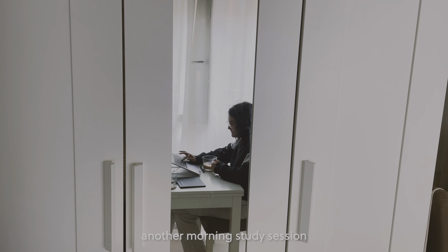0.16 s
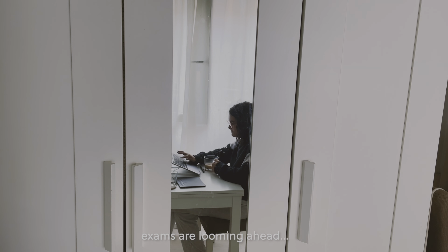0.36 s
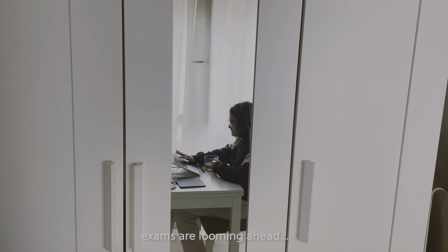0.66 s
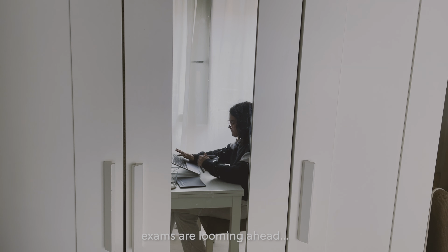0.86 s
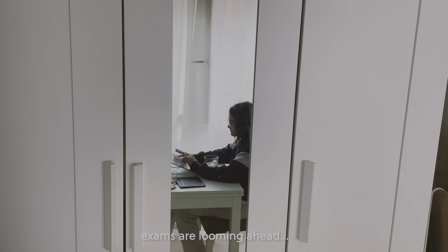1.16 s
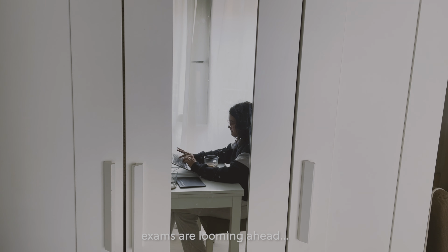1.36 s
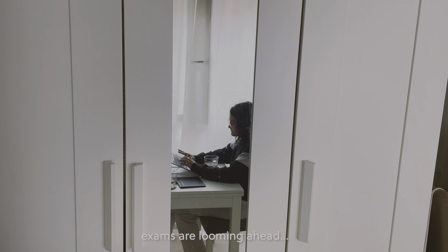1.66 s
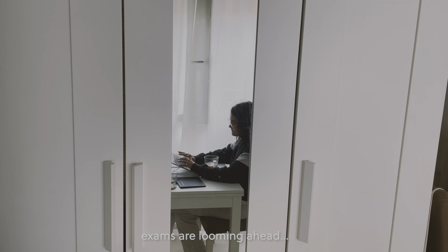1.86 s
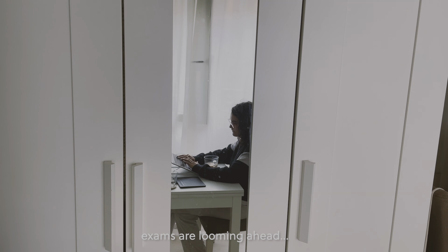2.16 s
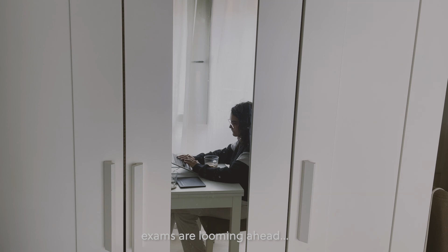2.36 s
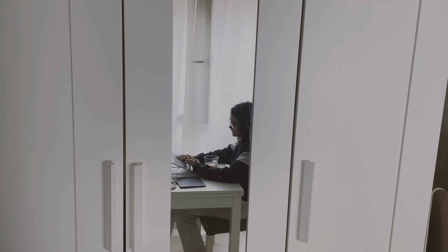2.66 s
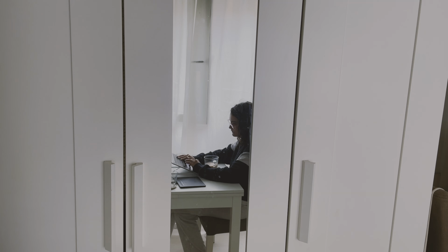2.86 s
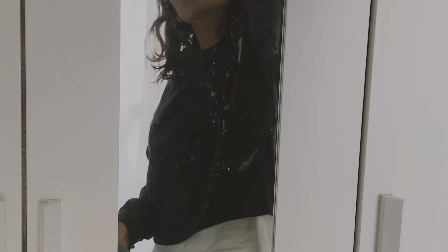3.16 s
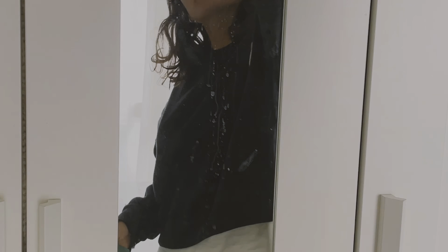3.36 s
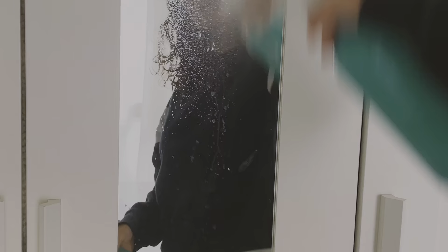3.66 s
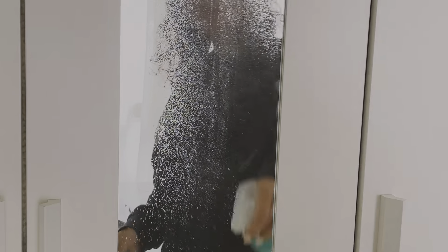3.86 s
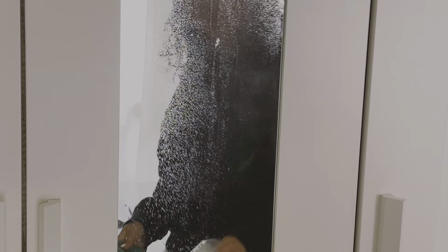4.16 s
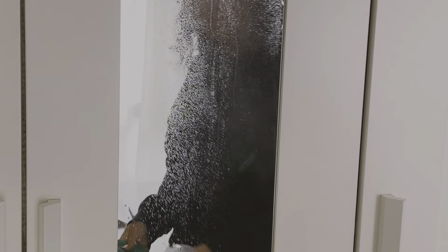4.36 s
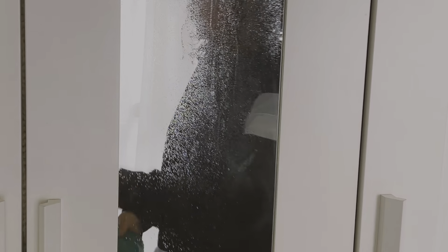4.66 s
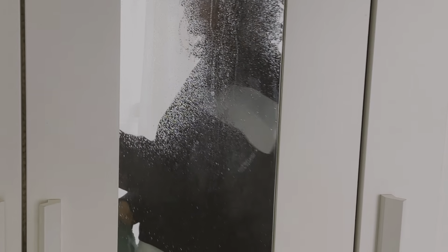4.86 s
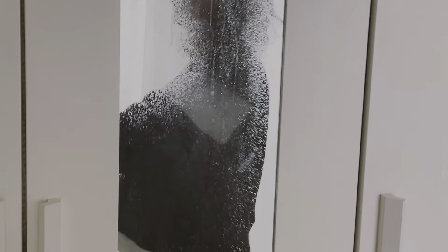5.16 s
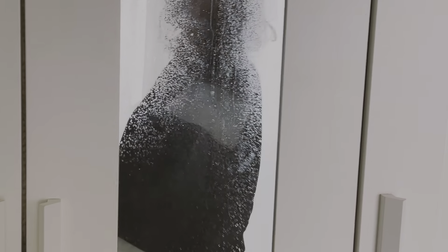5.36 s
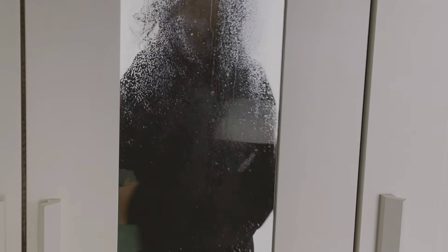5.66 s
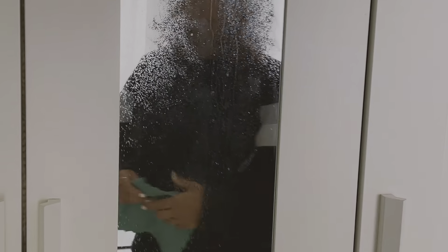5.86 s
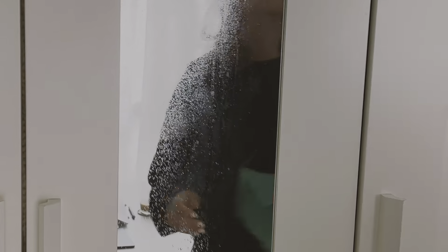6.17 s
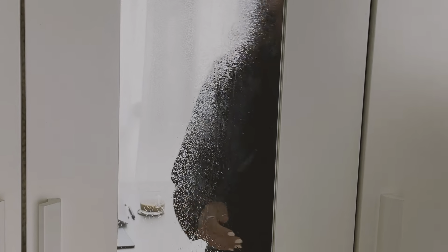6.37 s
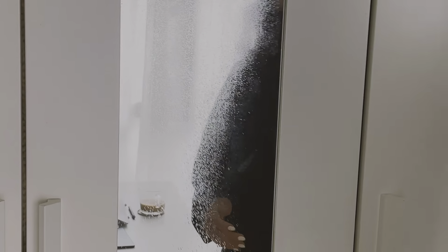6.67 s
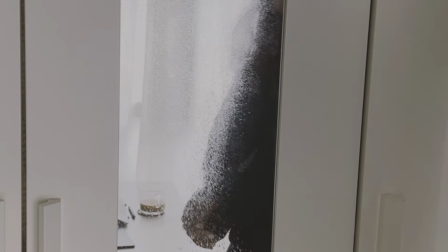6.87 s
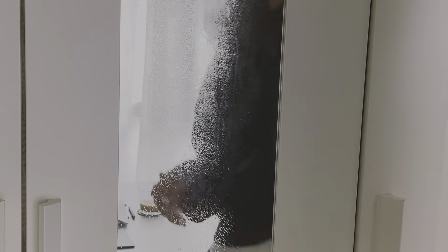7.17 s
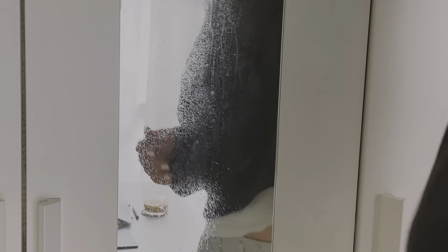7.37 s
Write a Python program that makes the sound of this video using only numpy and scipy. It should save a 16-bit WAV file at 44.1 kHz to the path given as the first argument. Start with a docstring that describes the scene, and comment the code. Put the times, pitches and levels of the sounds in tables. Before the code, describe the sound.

Quiet domestic room, close stereo pickup. Faint plumbing murmurs behind low rumble after an initial dull thump. The water cuts off, a spray bottle gives quick fine spattering squirts with tiny squeaks, and its plastic parts click sharply. Around the middle a single loud wooden knock shakes the wardrobe door; lighter taps and soft fabric wiping continue to the end, with a few low bumps.

```python
"""A thump of a door opens the scene, over a faint pipe whistle and house rumble in a bedroom with mirrored doors.
Water runs next door, as noise through pipe resonances; then a trigger bottle sprays the mirror, as spattering noise.
Its plastic parts and the door edge tick, as damped tones and noise bursts. The door is knocked hard: decaying modes
ring and loose fittings shudder. Sleeves and a cloth rustle in swells of noise. The microphone ports turn the
treble's phase."""
import sys
import numpy as np
from scipy import signal
from scipy.fft import rfft, irfft, next_fast_len
from scipy.io import wavfile
from scipy.ndimage import uniform_filter1d, map_coordinates

SR = 44100
rng = np.random.default_rng(int(sys.argv[2]) if len(sys.argv) > 2 else 0)


def level_to_linear(level):
    """Convert decibel levels to linear amplitude factors, elementwise."""
    exponent = np.asarray(level, float) / 20
    return 10 ** exponent


def waveform_to_disk(signal):
    """Save audio, clipped to [-1, 1], as 16-bit WAV at the path in sys.argv[1]."""
    frames = np.transpose(np.atleast_2d(signal))
    scaled = np.clip(frames, -1, 1) * 32767
    samples = np.round(scaled).astype(np.int16)
    wavfile.write(sys.argv[1], SR, samples)


N = 332028  # length [samples]

# Blows on the door: (time [s], relative panel level [dB], favoured panel pitch [Hz],
# relative edge level [dB], favoured edge pitch [Hz])
DOOR_BLOWS = [(.001, -21.5, 106, -37.5, 613), (2.812, -37.5, 119, -46, 586), (3.217, -33.5, 166, -50, 452),
              (5.023, -24, 204, -23.5, 810), (5.029, -25.5, 252, -9.5, 738),
              (5.0394, -5.5, 147.6, -31.5, 415), (5.055, -21, 290, -45, 480), (5.19, -48.5, 200, -34, 685),
              (5.204, -15.5, 122.6, -33.5, 505), (5.454, -35.5, 60, -41.5, 560),
              (5.562, -40, 61, -41.5, 600), (5.637, -35, 251, -46, 1060), (5.771, -36.5, 198, -40, 617),
              (5.8, -29, 106, -51, 460), (5.932, -39, 101, -38.5, 580), (5.974, -34, 201.2, -39.5, 640),
              (6.029, -39.5, 183, -41.5, 647), (6.048, -43, 200, -40.5, 640), (6.083, -34.5, 200, -39, 540),
              (6.129, -35, 230, -41.5, 480), (6.19, -50, 198, -47, 630), (7.245, -26.5, 75, -68, 450),
              (7.448, -33, 71, -74.5, 460)]
# Modes of the wide panel and of its stiff edge: (frequency [Hz], relative level [dB], decay by 60 dB [s])
PANEL_MODES = [(57.43, -1, 0.94), (78.2, 1.5, 0.31), (106, 1, 0.31), (137.9, 5, 0.059), (184.6, 6, 0.076),
               (236, 5.5, 0.032), (254.3, 1, 0.188), (287.5, 1.5, 0.174)]
EDGE_MODES = [(398, 2.5, 0.13), (480, -10, 0.16), (548, 0, 0.055), (646, 3.5, 0.053), (803, 9.5, 0.021),
              (924.4, 5, 0.022), (1040, 2, 0.039), (1087, 9, 0.015), (1445, 12.5, 0.017)]
# Mirror tones: (frequency [Hz], relative level [dB])
MIRROR_TONES = [(4580, 11.5), (5070, 8.5), (5900, -2)]
# Loose fittings set shaking: (time [s], level [dB])
SHUDDERS = [(.001, -45.5), (1.535, -49), (2.81, -40.5), (3.215, -35), (5.0397, -25.5), (5.204, -36),
            (5.454, -50.5), (5.637, -56.5), (5.79, -50), (5.974, -51), (6.06, -45.5), (6.922, -56.5),
            (7.237, -58)]
# Spectrum of the shaking: (frequency [Hz], relative level [dB])
SHUDDER_SPECTRUM = [(45, -18), (60, 0.5), (110, -0.5), (300, -7), (800, -16), (1500, -23.5), (3000, -74)]
# Door edge at the two ports: (frequency [Hz], left phase lead [rad])
EDGE_LEAD = [(200, 0), (600, 1.7), (1600, 2.9), (2100, 0)]
# Door edge at the two ports: (frequency [Hz], left minus right [dB])
EDGE_LEAN = [(250, -7.5), (700, 9.5), (1600, 2), (2200, -17.5)]

# Hard ticks of the bottle's plastic and of the door edge:
# (time [s], ring level [dB], ring pitch [Hz], crack level [dB])
TICKS = [(2.797, -47, 660, -57), (3.2176, -60, 500, -50), (3.235, -34.5, 3444, -58),
         (3.756, -25, 1106, -49), (3.791, -28.5, 2090, -56), (3.838, -46, 3310, -66),
         (3.862, -32.5, 1200, -72), (3.8988, -27, 2700, -47.5), (4.022, -43, 1200, -61.5),
         (4.138, -32.5, 1330, -49), (4.2, -45, 1970, -68), (5.023, -66, 2550, -33),
         (5.19, -34, 1070, -50.5), (5.271, -30, 1303, -41), (5.274, -28.5, 2990, -60),
         (5.375, -48, 1040, -68), (5.563, -66, 1720, -63.5), (5.634, -45, 1760, -61),
         (5.701, -49.5, 1040, -71.5), (5.774, -49, 1680, -71.5), (5.933, -58, 1970, -62.5),
         (6.071, -50, 2200, -61), (6.886, -42, 846, -71), (7.0709, -34, 860, -50)]
CRACK_HZ, CRACK_T60_S = 2410, 0.039
# Puffs and spits of hiss without ring: (time [s], level [dB], centre [Hz], decay by 60 dB [s])
PUFFS = [(.001, -45, 2550, 0.22), (0.548, -69.5, 6500, 0.32), (1.056, -76, 3440, 0.64),
         (1.29, -68, 4450, 0.3), (1.474, -74, 3520, 0.37), (2.813, -54.5, 1500, 0.403),
         (3.234, -60, 1490, 0.266), (3.307, -45.5, 11000, .04), (3.388, -41.5, 7000, 0.018),
         (3.521, -36.5, 10000, 0.017), (5.032, -43, 2800, 0.44), (7.0701, -40.5, 3600, 0.095)]

# Spray jet: (time [s], level [dB])
JET_LEVEL = [(3.26, -81.5), (3.28, -58), (3.308, -53.5), (3.328, -60.5), (3.402, -48), (3.528, -48),
             (3.67, -47), (3.748, -59.5), (3.78, -86)]
# Spray jet: (frequency [Hz], relative level [dB])
JET_SPECTRUM = [(290, -40), (500, -5.5), (2600, -6.5), (3350, -7.5), (5900, -11), (7500, -10), (9700, -7),
                (13400, -13), (15600, -4.5)]

# Spray squeaks, faint hums and thin whistles in the running water:
# (start [s], end [s], first pitch [Hz], last pitch [Hz], level [dB])
SQUEAKS = [(3.284, 3.329, 1473, 1513, -57), (3.339, 3.373, 1473, 1410, -56),
           (3.324, 3.358, 6100, 5760, -62.5), (3.625, 3.724, 2745, 2920, -54.5),
           (3.646, 3.73, 1480, 1492, -61), (3.69, 3.723, 5780, 5890, -60), (3.96, 5.07, 414, 416.3, -63),
           (4.3, 4.702, 2660, 2630, -74.5), (.69, .79, 3420, 3400, -85), (1.6, 2.6, 4270, 4200, -70),
           (2.3, 3.3, 3811, 3746, -73)]
# Wider bands of hiss: (start [s], end [s], first pitch [Hz], last pitch [Hz], level [dB])
SWISHES = [(1.55, 1.67, 1460, 1440, -65.5), (1.6, 1.819, 1360, 910, -70.5), (1.583, 1.7, 3050, 3050, -65.5),
           (6.145, 6.7, 5100, 5040, -75.5)]
SQUEAK_BLUR, SWISH_BLUR = .025, .17  # blur rate over first pitch
SQUEAK_CORE = 1.3  # steady tone against its random fuzz

# Pipe whistle: (time [s], pitch [Hz])
WHISTLE_PITCH = [(0, 2700), (.45, 2610), (.8, 2500), (1.15, 2390), (1.36, 2285), (1.7, 2240)]
# Pipe whistle: (time [s], level [dB], octave relative to it [dB])
WHISTLE_LEVEL = [(0, -69, -16.5), (.3, -71.5, -20.5), (.45, -73, -22), (.62, -80, -48), (.82, -73, -40),
                 (1.0, -79.5, -42), (1.2, -78, -42.5), (1.36, -71.5, -46), (1.58, -79, -40),
                 (1.7, -100, -37)]
# Water noise: (frequency [Hz], relative level [dB])
WATER_SPECTRUM = [(290, -19), (500, -9.5), (860, -7.5), (1060, -13.5), (1500, -9.5), (1750, -16),
                  (4170, -12), (6300, -15.5), (8800, -12), (11600, -22), (13500, -26.5), (15500, -22)]
# Pipe resonances: (centre [Hz], width at half amplitude [Hz], relative height [thirds of a dB])
PIPE_RESONANCES = [(862, 90, 0), (2100, 90, -3), (3130, 120, -9), (3800, 350, -3), (4250, 200, -2),
                   (4700, 150, -8), (5070, 150, -9)]
TAP_ON_S, TAP_OFF_S, TAP_DB = 1.639, 3.22, -60  # fully running, starts to stop, level when fully running
TAP_RISE_DB_PER_S, TAP_SAG_DB_PER_S, TAP_STOP_DB_PER_S = 244, 1.36, 3001

# Steady rub of clothes as the body moves: (time [s], bright rub level [dB], dull body level [dB])
FRICTION = [(0.2, -100, -75.5), (1.0, -105, -84), (1.5, -105, -81), (1.62, -100, -76), (3.7, -90, -74),
            (4.3, -87, -70.5), (5.0, -80, -68.5), (5.35, -84, -65.5), (5.65, -82.5, -70.5),
            (6.25, -76, -71), (6.85, -72, -72), (7.15, -73, -64.5), (7.4, -69, -75.5)]
# Cloth and sleeve sweeps: (peak time [s], bright rub level [dB], dull body level [dB],
# time to rise 20 dB [s, sign ignored], time to fall 20 dB [s, sign ignored])
SWEEPS = [(.2, -76.5, -74, 10, 0.15), (.72, -88.5, -86, -0.8, 1.2), (3.754, -71, -62.5, 1, 0.32),
          (3.9, -77, -72, -0.32, -0.1), (4.026, -84, -68, -2, -0.1), (4.14, -85, -59, 0.1, 0.23),
          (4.616, -63.5, -64, 0.1234, 0.0864), (5.3, -76, -70, 0.3, -0.1), (5.64, -73.5, -77, 0.4, 0.5),
          (5.745, -69.5, -71, .08, 0.7), (6.072, -83, -74, 1, -0.2), (6.128, -60.5, -74, -0.06, 0.1),
          (6.554, -72, -82, -1.1, 0.2), (6.952, -61, -59.5, 0.08, 0.05), (7.15, -64, -66.5, .15, 1.5),
          (7.4, -59.5, -80, .5, 0.24)]
# Bright rub and dull body of the fabric: (frequency [Hz], relative level [dB])
RUB_SPECTRUM = [(1760, -34), (3000, -5.5), (5900, -5), (7500, -1), (10600, -7), (13300, -13), (15600, -8.5)]
BODY_SPECTRUM = [(900, -5), (1300, 0.5), (2600, -2), (4000, -11.0), (7000, -34)]

# House: (time [s], deep rumble level [dB], door hum level [dB], room air level [dB])
HOUSE_LEVELS = [(0.2, -51, -64.5, -66), (0.32, -64, -64.5, -70.5), (0.53, -49.5, -61.5, -72),
                (1.1, -59.5, -62, -68), (1.5, -47.5, -57.5, -67), (1.9, -59.5, -56, -61.5),
                (2.4, -45.5, -60.5, -64), (2.95, -54.5, -51.5, -61), (3.19, -56.5, -58, -66),
                (3.3, -44.5, -46, -60.5), (3.7, -51.5, -54, -57), (4.4, -52.5, -54.5, -59.5),
                (5.0, -50.5, -56, -58.5), (5.3, -35, -36, -53), (5.6, -41, -44.5, -57.5),
                (6.0, -42, -40, -55.5), (6.4, -44.5, -52.5, -59.5), (6.88, -42, -51, -60),
                (7.05, -44.5, -54.5, -58.5), (7.28, -33.5, -47, -60.5), (7.42, -47.5, -55.5, -60.5)]
# Deep rumble, door hum, room air and hiss of the quiet room: (frequency [Hz], relative level [dB])
DEEP_SPECTRUM = [(15, -43), (25, -19), (38, -7), (59, 9.5), (71, -6), (95, -16.5), (120, -66.5),
                 (210, -120)]
HUM_SPECTRUM = [(50, -35.5), (85, -5), (108, 0.5), (150, -10), (205, -9.5), (280, -22.5), (300, -10.5),
                (390, -54), (660, -120)]
AIR_SPECTRUM = [(130, -12.5), (220, -6.5), (264, -16.5), (374, -6.5), (416, -5.5), (571, -12), (848, -12.5),
                (1960, -29.5), (2200, -38.5), (2860, -36), (4840, -120)]
STILL_SPECTRUM = [(800, -16), (2000, 14), (4000, -24), (7000, 9), (12000, -20), (15800, -22.5)]

# Spread noises: (frequency [Hz], left-right correlation [0-1])
LIKENESS = [(60, 0.98), (130, 0.94), (290, 0.45), (640, 0.031), (1400, 0.07), (2300, 0.64), (3600, 0.33),
            (5000, 0.73), (6000, 0.034)]
# Bedroom reverberation: (frequency [Hz], decay by 60 dB [s])
ROOM_DECAY = [(100, 0.62), (500, 0.4), (2000, 0.14), (6000, 0.28), (12000, 0.065)]
# Microphone ports: (frequency [Hz], left phase lead [rad], stereo width [0-1], left minus right [dB])
PORTS = [(200, 0, 1, -1.5), (1600, 0, 1, -1.5), (2400, .3, 1, 1.5), (5400, .3, 1, 2), (6100, -1.2, 1, 3),
         (6900, -2.9, .3, 0), (7600, -3.3, .2, 0), (9000, -4.4, .35, 0), (10600, -6.2, .18, 0),
         (11600, -6.35, .18, 0), (13000, -8.3, .6, 0), (13900, -9.42, .08, 0), (15600, -9.6, .15, 0)]


def unit(x):
    """Normalisation: scales a signal to rms 1."""
    return x / np.sqrt(np.mean(x ** 2) + 1e-20)


def along(points, hz):
    """Logarithmic frequency scale: interpolates (frequency [Hz], value) points."""
    f, v = np.transpose(points)
    return np.interp(np.log(hz + 1), np.log(f + 1), v)


def shape(spectrum):
    """Spectral envelope: the gain function of a (frequency [Hz], level [dB]) table."""
    return lambda hz: level_to_linear(along(spectrum, hz))


def curves(rows):
    """Time envelope: one value per sample for each column after the time."""
    s, *cols = np.transpose(rows)
    return [np.interp(np.arange(N) / SR, s, c) for c in cols]


def during(rows):
    """Gating: 1 inside the time span of a table, with 10 ms edges."""
    t = np.arange(N) / SR
    inside = np.minimum(t - rows[0][0], rows[-1][0] - t)
    return np.clip(inside * 100 + 1, 0, 1)


def wobble(rate, size=N):
    """Random modulation: a smooth curve through `rate` random knots a second."""
    knots = rng.standard_normal(int(size * rate / SR) + 4)
    return map_coordinates(knots, [np.arange(size) * rate / SR])


def filtered(x, response):
    """Linear filtering: multiplies the spectrum by a complex response of frequency."""
    m = next_fast_len(N + SR // 2)
    return irfft(rfft(x, m) * response(np.fft.rfftfreq(m, 1 / SR)), m)[..., :N]


def rush(gain, patchy_db, grain_db=0):
    """Partly correlated stereo noise, patchy in time and pitch, spattered in level; its mean channel has rms 1."""
    source = rng.standard_normal((2, N)) * level_to_linear(grain_db * wobble(900))
    z = signal.stft(source, nperseg=512)[2]
    field = uniform_filter1d(rng.standard_normal(z.shape[1:]), 6, 0)
    field = uniform_filter1d(field, 10, 1)
    pair = signal.istft(z * level_to_linear(patchy_db * unit(field)), nperseg=512)[1][:, :N]

    def mid_side_gain(hz):
        angle = np.arccos(np.clip(along(LIKENESS, hz), -1, 1)) / 2
        return gain(hz) * [np.cos(angle), np.sin(angle)]

    mid, side = filtered(pair, mid_side_gain)
    return np.array([mid + side, mid - side]) / np.sqrt(np.mean(mid ** 2))


def fuzzy_tone(hz, blur_rate, steady=0):
    """Narrow-band noise: a random envelope on a moving carrier, with a steady core, partly opposed in the channels."""
    carrier = np.exp(2j * np.pi * np.cumsum(hz) / SR)

    def band(core):
        envelope = core + wobble(blur_rate, size=len(hz)) + 1j * wobble(blur_rate, size=len(hz))
        return unit(np.real(carrier * envelope))

    return band(steady) + 0.35 * band(0) * [[1], [-1]]


def door():
    """Modal vibration: blows excite decaying panel and edge modes, most near the pitch the struck spot favours;
    hard blows make the mirror sing, and the loose fittings shudder."""
    panel, edge, shake, sing = np.zeros((4, N + SR))
    t = np.arange(SR // 2) / SR

    def ring(modes, best_hz, slope_db):  # slope in dB per octave
        total = 0
        for hz, db, t60 in modes:
            level = db - slope_db * abs(np.log2(hz / best_hz)) + rng.normal(0, 2.6)
            total = total + level_to_linear(level - 60 * t / t60) * np.sin(2 * np.pi * hz * t)
        return total

    for s, panel_db, panel_hz, edge_db, edge_hz in DOOR_BLOWS:
        at = slice(round(s * SR), round(s * SR) + len(t))
        panel_ring = ring(PANEL_MODES, panel_hz, slope_db=22.0)
        panel[at] += level_to_linear(panel_db - 1.5) * panel_ring * (1 - np.exp(-t / 0.0018))
        edge_ring = ring(EDGE_MODES, edge_hz, slope_db=18.5)
        edge[at] += level_to_linear(edge_db + 1.5) * edge_ring * (1 - np.exp(-t / 0.0012))
        sing[at] += level_to_linear(1.44 * edge_db - 49.5 - 60 * t / 0.65)  # grows faster than the blow
    for s, db in SHUDDERS:
        power = level_to_linear(2 * (db - 60 * t / 0.49)) * (1 - np.exp(-t / 0.0061)) ** 2
        shake[round(s * SR):][:len(t)] += power  # powers add
    shudder = np.sqrt(shake[:N]) * rush(shape(SHUDDER_SPECTRUM), patchy_db=1.5)
    tones = sum(level_to_linear(db) * fuzzy_tone(np.full(N, hz), blur_rate=340) for hz, db in MIRROR_TONES)
    return panel[:N], edge[:N], shudder + sing[:N] * tones


def clicks():
    """Impact excitation: ticks ring with the same loss in every cycle and crack; bursts decay in two stages."""
    out, t = np.zeros(N + SR), np.arange(SR // 2) / SR
    f = np.fft.rfftfreq(len(t), 1 / SR) + 1
    for s, ring_db, hz, _ in TICKS:
        tones = np.sin(2 * np.pi * hz * t) + 0.28 * np.sin(2 * np.pi * 1.37 * hz * t)
        onset = 1 - np.exp(-1.8 * hz * t)
        out[round(s * SR):][:len(t)] += level_to_linear(ring_db - 3.03 * hz * t) * tones * onset
    cracks = [(s, crack_db, CRACK_HZ, CRACK_T60_S) for s, _, _, crack_db in TICKS]
    for s, db, centre_hz, t60 in PUFFS + cracks:
        band = level_to_linear(-8.5 * np.hypot(.6, np.log2(f / centre_hz)))  # nears 8.5 dB per octave
        noise = unit(irfft(rfft(rng.standard_normal(len(t))) * band, len(t)))
        decay = level_to_linear(-60 * t / abs(t60)) + 0.27 * level_to_linear(-60 * t / 0.0069)
        out[round(s * SR):][:len(t)] += level_to_linear(db) * noise * decay
    return out[:N]


def spray():
    """Jet noise: broadband hiss, spattered as by droplets, while the trigger is pulled."""
    level_db = curves(JET_LEVEL)[0] + 0.83 * wobble(35)
    return during(JET_LEVEL) * level_to_linear(level_db) * rush(shape(JET_SPECTRUM), patchy_db=2.2, grain_db=0.5)


def squeaks_and_swishes():
    """Band noise: squeaks, thin whistles, a faint hum and wider swishes; the higher, the more they blur."""
    out = np.zeros((2, N))
    for rows, blur, steady in ((SQUEAKS, SQUEAK_BLUR, SQUEAK_CORE), (SWISHES, SWISH_BLUR, 0)):
        for start, end, first_hz, last_hz, db in rows:
            at = slice(round(start * SR), round(end * SR))
            part = np.linspace(0, 1, at.stop - at.start)
            swell = np.sqrt(np.sin(np.pi * part).clip(0))
            pitch = first_hz + part * (last_hz - first_hz)
            out[:, at] += level_to_linear(db) * swell * fuzzy_tone(pitch, blur * first_hz, steady)
    return out


def rustle():
    """Friction noise: fabric rubs in grainy sweeps over a steady friction, with a duller body under them."""
    bright = rush(shape(RUB_SPECTRUM), patchy_db=0.8, grain_db=1.0)
    body = rush(shape(BODY_SPECTRUM), patchy_db=0.9)
    power, t = level_to_linear(2 * np.array(curves(FRICTION))), np.arange(N) / SR
    for s, rub_db, body_db, rise_s, fall_s in SWEEPS:
        distance = np.where(t < s, (s - t) / abs(rise_s), (t - s) / abs(fall_s))
        swell = level_to_linear(-40 * distance)  # in power: 20 dB per unit of distance
        power = power + level_to_linear([[2 * rub_db], [2 * body_db]]) * swell
    return np.sqrt(power[0]) * bright + np.sqrt(power[1]) * body


def plumbing():
    """Pipe resonance: the whistle sinks as the pipe fills; then water noise passes through the pipe's peaks."""
    (hz,), (db, octave_db), t = curves(WHISTLE_PITCH), curves(WHISTLE_LEVEL), np.arange(N) / SR
    octave = level_to_linear(octave_db) * fuzzy_tone(2 * hz, blur_rate=130)
    whistle = level_to_linear(db) * (fuzzy_tone(hz, blur_rate=270, steady=1.42) + octave)

    def water_gain(f):
        peaks = sum(level_to_linear(height / 3) / (1 + (2 * (f - c) / w) ** 2) for c, w, height in PIPE_RESONANCES)
        return shape(WATER_SPECTRUM)(f) * (1 + 1.16 * peaks)

    water = rush(water_gain, patchy_db=0.34, grain_db=0.68)
    flow_db = TAP_DB - TAP_RISE_DB_PER_S * (TAP_ON_S - t).clip(0)
    flow_db = flow_db - TAP_SAG_DB_PER_S * (t - TAP_ON_S).clip(0)
    flow_db = flow_db - TAP_STOP_DB_PER_S * (t - TAP_OFF_S).clip(0)
    return whistle + level_to_linear(flow_db + .6 * wobble(15)) * water


def house():
    """Filtered background noise: lumpy rumble, a hum of the loose doors, and soft hisses of the room's air."""
    deep_db, hum_db, air_db = curves(HOUSE_LEVELS)
    deep = level_to_linear(deep_db + 1.5 * wobble(9)) * rush(shape(DEEP_SPECTRUM), patchy_db=.6)
    hum = level_to_linear(hum_db + 1.2 * wobble(14)) * rush(shape(HUM_SPECTRUM), patchy_db=1.8)
    air = level_to_linear(air_db + .8 * wobble(12)) * rush(shape(AIR_SPECTRUM), patchy_db=.8)
    still = level_to_linear(-85.5) * rush(shape(STILL_SPECTRUM), patchy_db=-1.5)
    return deep + hum + air + still


def room(x):
    """Reverberation: convolution with noise in which each frequency dies at its own speed."""
    hz, t, z = signal.stft(rng.standard_normal((2, SR // 2)), SR, nperseg=256)
    decay = level_to_linear(-60 * t / along(ROOM_DECAY, hz)[:, None])
    tail = signal.istft(z * decay, SR, nperseg=256)[1]
    delayed = np.pad(x, (260, 0))[None]  # 5.9 ms
    return signal.fftconvolve(delayed, tail / np.linalg.norm(tail[0]), axes=1)[:, :N]


def placed(x, lead, lean_db):
    """Interchannel phase and level difference: half of each is given to either side."""
    side = np.array([[.5], [-.5]])
    return filtered(x, lambda hz: level_to_linear(side * lean_db(hz)) * np.exp(1j * side * lead(hz)))


def scene():
    """Superposition: blows and clicks sound directly and as echoes; the door edge leads in phase on the left."""
    ticks, (panel, edge, rattle) = clicks(), door()
    placed_edge = placed(edge, lambda hz: along(EDGE_LEAD, hz), lambda hz: along(EDGE_LEAN, hz))
    direct = ticks + panel + placed_edge
    echo = level_to_linear(-5.5) * room(ticks) + level_to_linear(-19.0) * room(panel) + level_to_linear(-13.5) * room(edge)
    return direct + echo + rattle + spray() + squeaks_and_swishes() + rustle() + plumbing() + house()


def roll_off(x):
    """The treble ends steeply here."""
    return signal.sosfilt(signal.butter(12, 15820, fs=SR, output="sos"), x)


def record(dry):
    """Two-port reception: in the treble, a narrowed image whose phase turns between left and right."""
    hz, lead, width, lean_db = np.transpose(PORTS)
    mid = dry.mean(0)
    side = filtered((dry[0] - dry[1]) / 2, lambda f: np.interp(f, hz, width))
    narrowed = np.array([mid + side, mid - side])
    ports = placed(narrowed, lambda f: np.interp(f, hz, lead), lambda f: np.interp(f, hz, lean_db))
    ports = filtered(ports, lambda f: (1j * f / (38 + 1j * f)) ** 2)  # the capsules lose the lowest bass
    return roll_off(ports)


dry = scene()
out = record(dry)
waveform_to_disk(out)
```